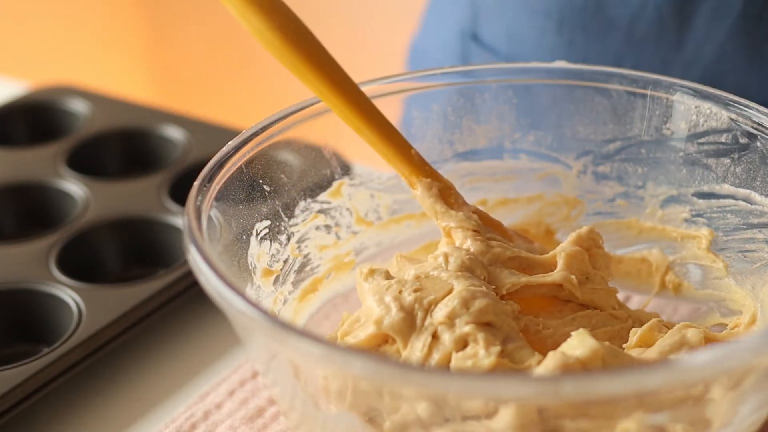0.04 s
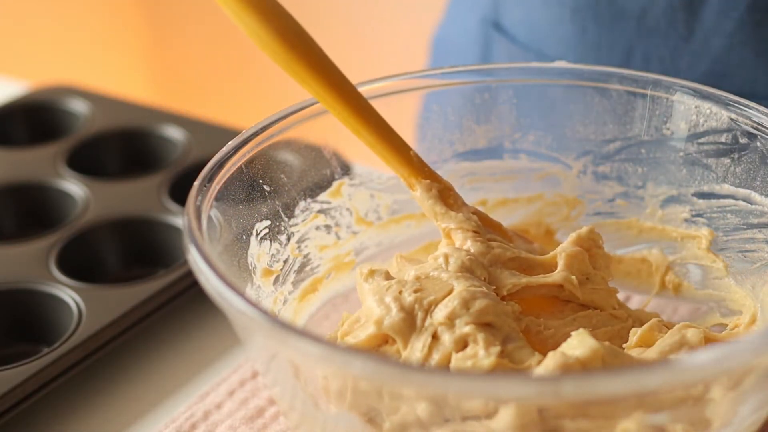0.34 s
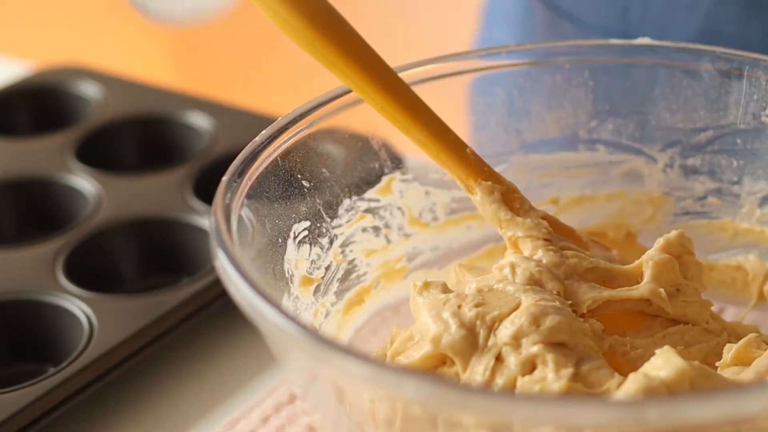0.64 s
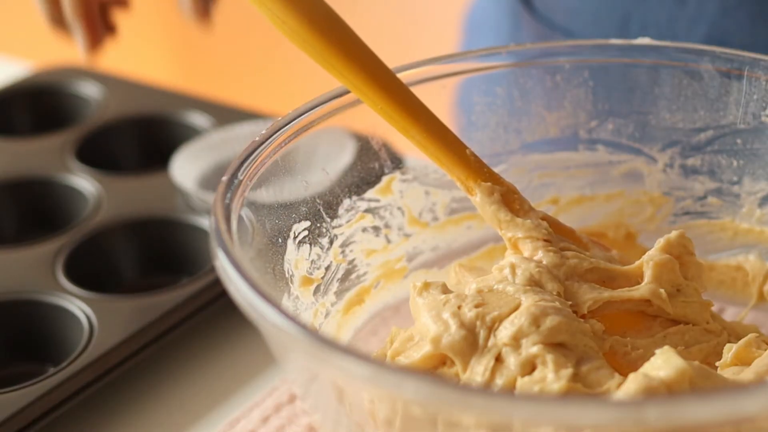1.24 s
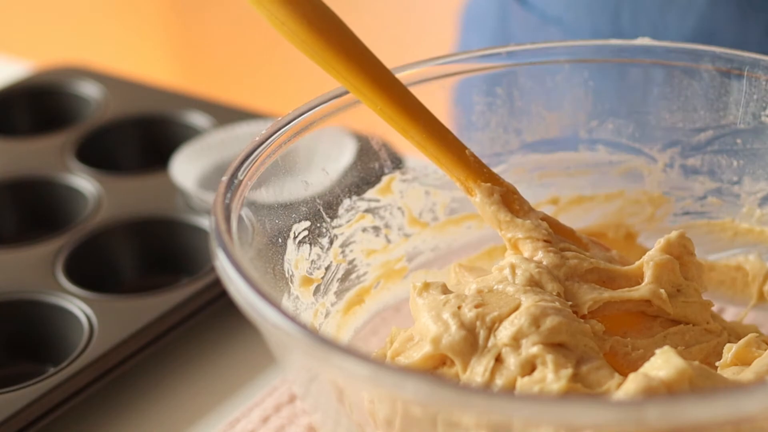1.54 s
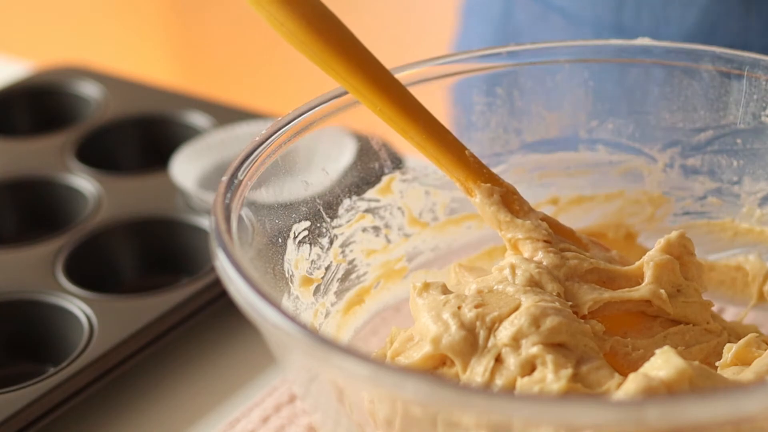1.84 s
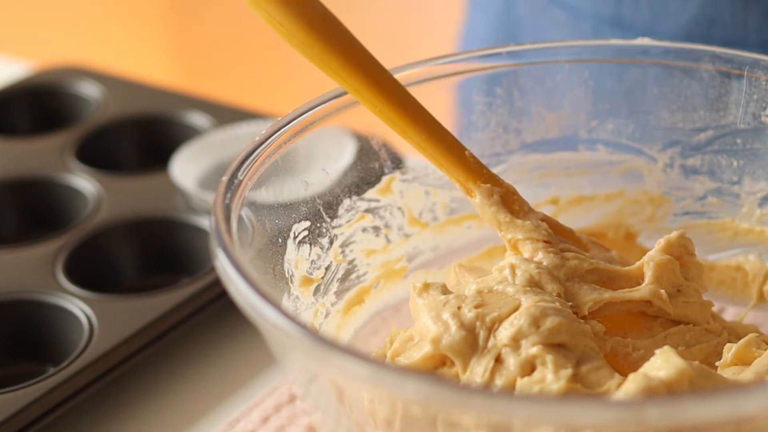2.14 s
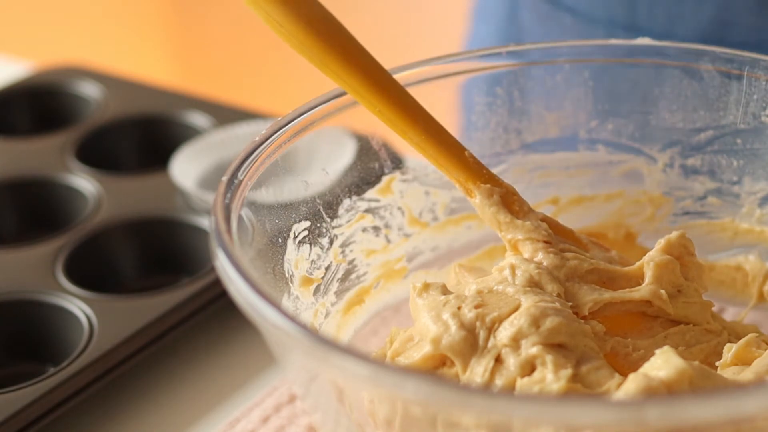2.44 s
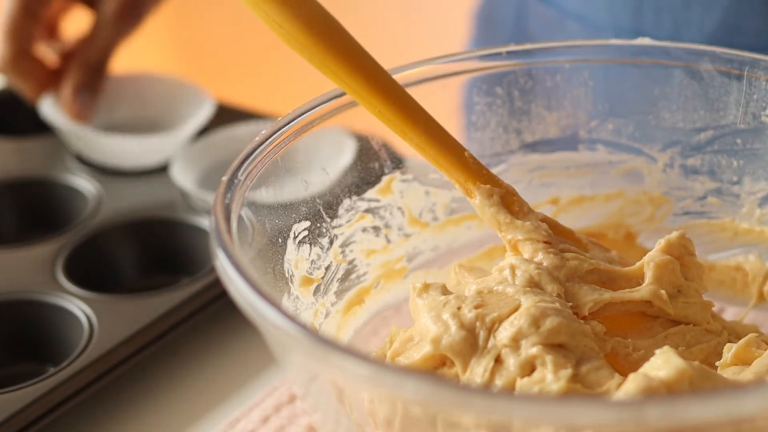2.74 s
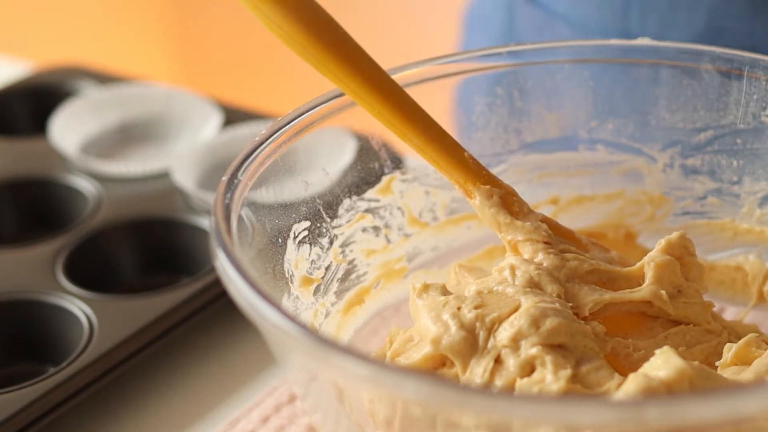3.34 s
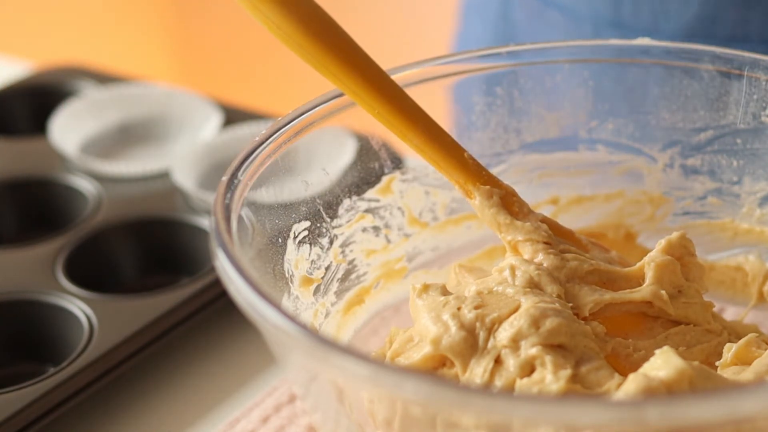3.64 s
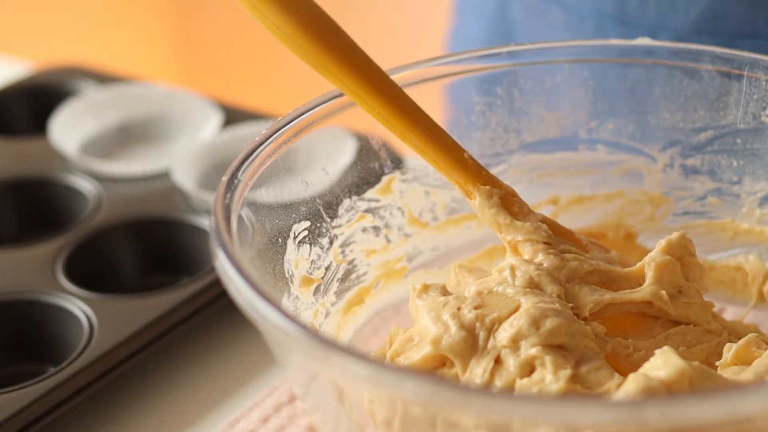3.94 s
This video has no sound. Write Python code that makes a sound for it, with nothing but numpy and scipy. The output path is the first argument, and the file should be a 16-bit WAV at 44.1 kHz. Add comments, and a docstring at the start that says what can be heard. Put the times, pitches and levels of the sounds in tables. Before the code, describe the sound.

Paper muffin liners crinkle and rustle as they are separated and set in a tin.

```python
"""Muffin liners and a tin

Paper liners are peeled off a stack and pressed into a metal tin, close by in a quiet kitchen.
Stick-slip friction between pleats gives dense tiny slips and short crunches; buckling makes a seated
liner crinkle and single creases snap. One liner lands with a tap and a hollow thud from the tin's modes.
A faint narrow hiss and a low room hum lie underneath."""
import sys
import numpy as np
from scipy import signal
from scipy.fft import rfft, irfft
from scipy.io import wavfile

SR = 44100
rng = np.random.default_rng(int(sys.argv[2]) if len(sys.argv) > 2 else 0)


def int16_out(signal):
    """Quantize to a 16-bit WAV file."""
    q = np.round(np.clip(np.atleast_2d(signal).T, -1, 1) * 32767)
    wavfile.write(sys.argv[1], SR, q.astype(np.int16))


N = 176400
TIME = np.arange(N) / SR
PAPER_LOW_HZ = 1110  # thin paper radiates little below this
WIDE_HZ = 8500  # above this a slight stereo width is added to the treble
# spectrum of crinkling paper: f/Hz, relative spectral level/dB
CRINKLE_SPECTRUM = [(200, -42), (600, -29), (850, -21), (1100, -13.5), (1400, -1.5), (1900, 1),
                    (2350, -6.5), (2700, -2), (3200, -3.5), (3800, 2), (5000, -3), (6500, -3.5),
                    (10000, -8), (13500, -19), (15000, -41.5)]


def sliding():
    """Stick-slip friction of pleat on pleat; the flexing cup adds body, the edges add treble."""
    # one envelope per pull off the stack: t/s, relative level/dB, body trim/dB, treble trim/dB
    pulls = [
        [(0.0, -45.5, -0.5, -18), (0.024, -44, -20, -12.5), (0.096, -47, -13.5, -11), (0.136, -41, -6.5, -26),
         (0.156, -37, -23.5, -13.5), (0.202, -31, -18.5, -10), (0.222, -37, -14.5, -9), (0.234, -43, -28, -15),
         (0.246, -31, -27.5, -16), (0.256, -39.5, -6, -14.5), (0.304, -57.5, -22, -20),
         (0.35, -50.5, -10.5, -14.5)],
        [(0.39, -43.5, -32.5, -12.5), (0.428, -38, -13, -17), (0.452, -50.5, -5, -9.5),
         (0.48, -34.5, -2.5, -27.5), (0.526, -45, -17.5, -17), (0.584, -26.5, -6.5, -19.5),
         (0.652, -50, -5, -17.5), (0.678, -42.5, 3, -6), (0.696, -48, -1, -27), (0.704, -44.5, -14, -26),
         (0.756, -52, -9, -22), (0.806, -74, -15, -19), (0.84, -59, -16, -13), (0.87, -68, -9, -16),
         (0.898, -55.5, -23, 2.5), (0.95, -62, -4, -15)],
        [(1.71, -58.5, -14, -10), (1.726, -44.5, -38, -9), (1.818, -52, -14.5, -22.5),
         (1.888, -35.5, -13.5, -11), (1.954, -34.5, -19.5, -16), (1.992, -32, -13, -8), (2.078, -37.5, -3, -6),
         (2.094, -28, -8.5, -9), (2.126, -52, -20, 1), (2.15, -31, -7.5, -7.5), (2.18, -42, 5.5, -14.5),
         (2.236, -34.5, -11, -14.5), (2.272, -66, -15.5, -9.5)],
        [(3.702, -62.5, -10, -13), (3.712, -45, -32, -20), (3.744, -35.5, -12, -8), (3.776, -63.5, -16, -3),
         (3.804, -55, -11, -26), (3.866, -43, -8, -13), (3.898, -35, -15, -8.5), (3.966, -35.5, -14.5, -8.5),
         (4.0, -37.5, -3.5, -14)],
    ]
    # spectrum of sliding paper: f/Hz, relative spectral level/dB
    spectrum = [(150, -41), (400, -31), (600, -8), (850, -4.5), (1020, -8), (1250, -0.5), (1900, 0),
                (2350, -3.5), (2800, 2.5), (3400, 4), (3850, -0.5), (4250, 1), (5000, -1), (8000, -5),
                (13400, -13.5), (14300, -39), (16000, -59)]
    body_hz, treble_hz = 1110, 6400

    def slips():
        return rms_one(colour(grains(per_s=5000, spread_db=1, flutter_db=1), spectrum))
    paper, ticks = slips(), ticking()
    body = from_db(13) * flicker(steep(paper, body_hz, "low"))
    middle = steep(steep(paper, body_hz, "high"), treble_hz, "low")
    side = 0.55 * steep(slips(), WIDE_HZ, "high") * [[1], [-1]]
    treble = from_db(8) * flicker(steep(paper + side, treble_hz, "high"))
    out = 0
    for pull in pulls:
        bands = middle + ticks + body * gain_curve(pull, 2) + treble * gain_curve(pull, 3)
        out += gain_curve(pull) * bands
    return from_db(-2) * out


def ticking(per_s=260, pitches=8, t60_cycles=11):
    """Impulse responses of single pleats flicking past one another, each at its own pitch."""
    out = 0
    for hz in np.geomspace(1800, 8800, pitches):
        pleat = ring(0, [(hz, 0, t60_cycles / hz)])[:SR // 100]
        flicks = grains(per_s / pitches, spread_db=1, flutter_db=0)
        out += signal.oaconvolve(flicks, pleat)[:N]
    return from_db(-10) * rms_one(steep(out, PAPER_LOW_HZ, "high"))


def crinkling():
    """Buckling of the pleats gives a bright train of impulses as a liner is seated."""
    # one envelope per press into a cup: t/s, relative level/dB
    presses = [
        [(.96, -59), (.972, -36.5), (1.0, -54), (1.022, -44), (1.04, -61), (1.06, -39), (1.11, -39),
         (1.16, -44.5), (1.18, -50), (1.203, -39.5), (1.25, -39), (1.285, -31.5), (1.305, -43.5), (1.36, -77)],
        [(2.8, -82), (2.86, -51.5), (2.905, -36.5), (2.945, -57), (2.982, -43), (3.03, -58.5), (3.047, -31),
         (3.064, -34.5), (3.085, -46), (3.155, -46.5), (3.178, -33.5), (3.21, -52.5), (3.27, -84)],
    ]

    def buckles():
        return rms_one(colour(grains(per_s=2800, spread_db=1.5, flutter_db=2), CRINKLE_SPECTRUM))
    centre = buckles()
    side = 0.1 * steep(buckles(), WIDE_HZ, "high") * [[1], [-1]]
    return from_db(-1) * (centre + side) * sum(gain_curve(press) for press in presses)


def snapping():
    """Sudden buckling of a crease: a click, a spray of smaller ones and a ring of the facet beside it."""
    # creases: t/s, relative level/dB, ring f/Hz, treble edge f/Hz
    creases = [(.193, -29, 3020, 5960), (0.459, -31, 1216, 3000), (.704, -29.5, 3300, 3700),
               (0.9635, -33, 2000, 13900), (1.0525, -34.5, 5020, 14000), (1.0634, -32, 5100, 10650),
               (1.227, -32, 4500, 14300), (1.2478, -35, 3970, 9900), (1.277, -33, 3730, 13000),
               (1.2817, -24.5, 3880, 14900), (2.055, -23, 932, 4500), (2.09, -28.5, 3130, 11000),
               (2.095, -26, 2830, 11000), (2.201, -29.5, 1956, 7000), (2.231, -31.5, 1940, 5500),
               (2.8436, -36.5, 1460, 14000), (2.9, -39.5, 3980, 12000), (2.976, -35.5, 4120, 13000),
               (3.0433, -30.5, 2770, 13030), (3.049, -30.5, 3670, 13000), (3.0575, -28, 4350, 14950),
               (3.0625, -29.5, 3520, 13000), (3.17, -39.5, 3810, 12000), (3.188, -32, 3790, 12000),
               (3.7126, -48, 1910, 7150)]
    # spectrum of a snap: f/Hz, relative spectral level/dB
    spectrum = [(200, -25.5), (700, -17.5), (1400, -1), (3800, -3), (6500, -4), (10000, -5), (13500, -4),
                (16000, -21)]
    cracks, rings = np.zeros((2, N))
    spray = rng.choice([-1, 1], N)
    for start, db, hz, edge_hz in creases:
        force = from_db(db - 2) * decay(start, t60=0.015) * spray
        force[int(start * SR)] += from_db(db + 10)  # the leading click
        cracks += butter(force, edge_hz, "low")
        rings += ring(start, [(hz, db - 3.5, 0.042)])
    return colour(cracks, spectrum) + butter(rings, PAPER_LOW_HZ, "high")


def crunching(slips_per_s=1200, t60_cycles=6):
    """Impulse excitation: a dying run of slips strikes one panel, which rings briefly each time."""
    # pleats giving way: t/s, relative level/dB, panel f/Hz
    crunches = [(0.144, -41.5, 1230), (.167, -41.5, 3200), (.424, -42, 3330), (.473, -35.5, 3400),
                (.479, -37, 1420), (0.496, -38, 1500), (.548, -34, 1660), (0.571, -36.5, 3150),
                (.581, -32.5, 1300), (.674, -39.5, 1850), (0.703, -36.5, 1740), (.832, -50.5, 2100),
                (1.889, -35, 3350), (2.149, -35, 2850), (2.173, -41.5, 1490), (2.211, -38.5, 1310),
                (2.23, -37, 1380)]
    out = np.zeros(N)
    for start, db, hz in crunches:
        slips = (rng.random(N) < slips_per_s / SR) * rng.choice([-1, 1], N)
        slips[int(start * SR) + 1] = 1
        force = rms_one(slips) * decay(start, t60=0.06)
        panel = ring(0, [(hz, 0, t60_cycles / hz)])[:SR // 50]
        out += from_db(db) * signal.oaconvolve(force, panel / np.linalg.norm(panel))[:N]
    return butter(butter(out, PAPER_LOW_HZ, "high"), 4200, "low")


def rubbing(q=8.2, sag=0.04):
    """Friction drives a panel's resonance, which swells, sags in pitch as the paper bends, and fades."""
    # rubs: middle t/s, duration/s, level/dB, f/Hz
    rubs = [(0.067, 0.3, -55.5, 932), (0.195, 0.11, -49, 910), (0.971, 0.027, -54, 750),
            (1.136, 0.12, -42.5, 4050), (1.265, 0.16, -50.5, 3830), (1.257, 0.17, -61.5, 744),
            (1.324, 0.25, -66, 923), (1.984, 0.16, -40.5, 3425), (1.999, 0.066, -37, 4270),
            (2.196, 0.1, -45, 1461), (2.21, 0.086, -46, 1930), (2.193, 0.086, -51, 621),
            (2.467, 0.022, -54, 3330), (3.943, 0.2, -44, 2743), (3.95, 0.17, -42, 3500)]
    out = np.zeros(N)
    for middle, length, db, hz in rubs:
        along = progress(middle, length)
        pitch = hz * (1 - sag * (along - 0.5))
        out += from_db(db) * np.sin(np.pi * along) * narrow_noise(pitch, hz / q)
    return out


def scraping():
    """Light friction: sparse, dull slips as a lifted liner brushes its neighbour."""
    # scrapes: middle t/s, duration/s, level/dB
    scrapes = [(0.757, 0.037, -47.5), (.9, 0.086, -53.5), (2.33, 0.17, -68), (2.416, 0.08, -58)]
    slips = colour(grains(per_s=1200, spread_db=1.5, flutter_db=1), CRINKLE_SPECTRUM)
    swells = sum(from_db(db) * np.sin(np.pi * progress(middle, length)) for middle, length, db in scrapes)
    return rms_one(butter(slips, 2060, "low")) * swells


def popping():
    """Snap-through: a liner's wall flips with a bright crack and a few cycles of ringing."""
    # jerks of the wall: t/s, relative level/dB
    jerks = [(.3668, -1), (0.3681, -6)]
    # modes of the wall: f/Hz, level/dB, T60/s
    modes = [(2070, -35, 0.011), (3220, -17, .009), (3550, -16.5, 0.009), (4305, -21.5, 0.0074)]
    crack = from_db(-29.5) * band_noise(3490, 8000)
    pops = sum(from_db(db) * (crack * decay(start, t60=0.017) + ring(start, modes)) for start, db in jerks)
    return steep(pops, 1984, "high")


def tapping():
    """Free vibration of a liner's base after it taps the tin."""
    # modes of the base: f/Hz, level/dB, T60/s
    modes = [(450, -42, 0.099), (1432, -37, 0.044), (1545, -33.5, 0.025)]
    return butter(ring(start=2.843, modes=modes), 350, "high")


def thudding(attack_s=0.0049, puff_hz=386):
    """Soft impacts excite the tin's low modes and push a puff of air out of the cup."""
    # blows on the tin: t/s, relative level/dB
    blows = [(0.963, -25), (1.283, -23), (2.878, 3)]
    # modes of the tin: f/Hz, level/dB, T60/s
    modes = [(135, -56, 0.27), (225.5, -51, 0.37), (306, -39.5, 0.25), (421, -37, 0.2), (498, -42, 0.17),
             (719, -49, 0.22), (760, -51.5, .11)]
    puff = from_db(-43) * band_noise(puff_hz / 1.3, puff_hz * 1.61)
    out = np.zeros(N)
    for start, db in blows:
        contact = np.clip((TIME - start) / attack_s, 0, 1)
        out += from_db(db) * contact * (ring(start, modes) + puff * decay(start, t60=0.22))
    return butter(out, [51.6, 900], "band")


def kitchen(x, gap_s=0.0026, crossover_hz=4500):
    """Reverberation: a short, slightly dull diffuse tail whose treble dies first."""
    low, high = rng.standard_normal((2, N))
    low = steep(low, crossover_hz, "low") * decay(gap_s, t60=0.28)
    high = butter(high, crossover_hz, "high") * decay(gap_s, t60=0.25)
    tail = butter(low + high, 6900, "low")[:SR // 2]
    return from_db(-11.5) * signal.fftconvolve(x, tail / np.linalg.norm(tail))[:N]


def background():
    """Filtered noise: a low room hum and a faint narrow hiss that wavers in level and pitch."""
    # course of the hiss: t/s, level/dB, f/Hz
    course = [(0, -86, 3187), (.8, -61.5, 3217), (1.4, -61, 3294), (1.58, -60.5, 3190), (1.7, -59.5, 3253),
              (2.35, -60.5, 3228), (2.62, -73, 3170), (2.78, -73, 3297), (3.4, -78, 3217),
              (3.62, -78.5, 3393), (4, -72, 3260)]
    # spectrum of the room hum: f/Hz, relative spectral level/dB
    spectrum = [(20, -28.5), (48, -9), (65, -7), (85, 0.5), (120, -12.5), (150, -2), (175, -15), (215, 5),
                (255, -8.5), (298, -1.5), (360, -15), (800, -19.5), (1600, -26), (5000, -31.5), (9000, -35),
                (16000, -57)]
    times, _, hz = np.transpose(course)
    pitch = np.interp(TIME, times, hz)
    hiss = narrow_noise(pitch, width_hz=190) + from_db(-8) * narrow_noise(pitch, width_hz=850)
    waver = from_db(1.5 * drift(16))
    hum = from_db(-70.5) * colour(rng.standard_normal(N), spectrum)
    return hum + gain_curve(course) * rms_one(waver * hiss)


def grains(per_s, spread_db, flutter_db):
    """Poisson impulses of uneven size, clumped by a fluttering level."""
    sizes = from_db(spread_db * np.minimum(rng.exponential(1, N), 4)) * rng.choice([-1, 1], N)
    hits = rng.random(N) < per_s / SR
    return rms_one(sizes * hits * from_db(flutter_db * drift(64)))


def flicker(x, depth_db=2.5):
    """Amplitude modulation: a band swells and sinks on its own as the paper bends."""
    return x * rms_one(from_db(depth_db * drift(30)))


def drift(hz):
    """Low-pass random fluctuation of unit rms."""
    return rms_one(butter(rng.standard_normal(N + SR), hz, "low")[SR:])


def band_noise(low_hz, high_hz, shape=N):
    """Band-limited noise of unit rms."""
    return rms_one(butter(rng.standard_normal(shape), [low_hz, high_hz], "band"))


def narrow_noise(hz, width_hz):
    """Quadrature modulation centres a band of noise on a moving pitch."""
    phase = 2 * np.pi * np.cumsum(hz) / SR
    a, b = rms_one(butter(rng.standard_normal((2, N)), width_hz / 2, "low"))
    return a * np.cos(phase) + b * np.sin(phase)


def ring(start, modes):
    """Damped modes set off together, each given as f/Hz, level/dB, T60/s."""
    return sum(from_db(db) * decay(start, t60) * np.sin(2 * np.pi * hz * (TIME - start))
               for hz, db, t60 in modes)


def decay(start, t60):
    """Sudden onset, then exponential decay by 60 dB in t60 seconds."""
    return (TIME >= start) * np.exp(-np.log(1000) * np.clip((TIME - start) / t60, 0, 10))


def progress(middle, length):
    """Linear ramp from 0 to 1 across an event."""
    return np.clip((TIME - middle) / length + 0.5, 0, 1)


def gain_curve(rows, column=1, fade_s=0.021):
    """Envelope from a dB column, fading to silence outside its span."""
    rows = np.array(rows)
    outside = np.maximum(rows[0, 0] - TIME, TIME - rows[-1, 0])
    return from_db(np.interp(TIME, rows[:, 0], rows[:, column])) * np.clip(1 - outside / fade_s, 0, 1)


def colour(x, spectrum, size=8192):
    """Minimum-phase filter of unit power gain with the given spectrum."""
    hz, db = np.transpose(spectrum)
    log_hz = np.log(np.fft.rfftfreq(size, 1 / SR) + 1)
    magnitude = from_db(np.interp(log_hz, np.log(hz), db))
    cepstrum = irfft(np.log(magnitude))
    cepstrum[size // 2:] = 0  # makes the response causal
    response = irfft(np.exp(2 * rfft(cepstrum)))
    return signal.fftconvolve(x, response / np.linalg.norm(response))[:N]


def butter(x, hz, kind):
    """Second-order filter."""
    return signal.sosfilt(signal.butter(2, hz, kind, fs=SR, output="sos"), x + 1e-18)


def steep(x, hz, kind):
    """Fourth-order cascade."""
    return butter(butter(x, hz, kind), hz, kind)


def from_db(db):
    """Decibels to gain."""
    return 10 ** (np.asarray(db) / 20)


def rms_one(x):
    """Scale to unit rms."""
    return x / np.sqrt(np.mean(x ** 2) + 1e-20)


def scene():
    """Superposition of the paper, its reverberation, the tin and the background."""
    paper = sliding() + rubbing() + scraping() + crunching() + crinkling() + snapping() + popping()
    paper += tapping()
    return paper + kitchen(paper.mean(axis=0)) + thudding() + background()


def record(dry, cutoff_hz=15800):
    """Each channel adds a trace of self-noise; a steep low-pass limits the bandwidth."""
    hiss = from_db(-85) * band_noise(70, 2500, shape=(2, N))
    return signal.sosfilt(signal.ellip(10, 0.1, 80, cutoff_hz, fs=SR, output="sos"), dry + hiss)


dry = scene()
out = record(dry)
int16_out(out)
```